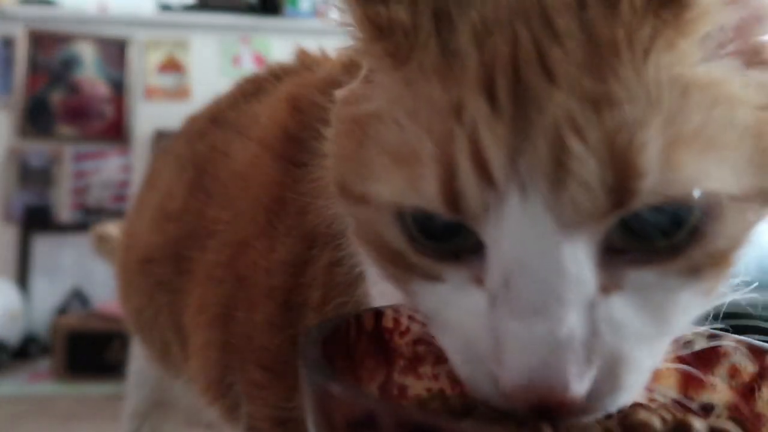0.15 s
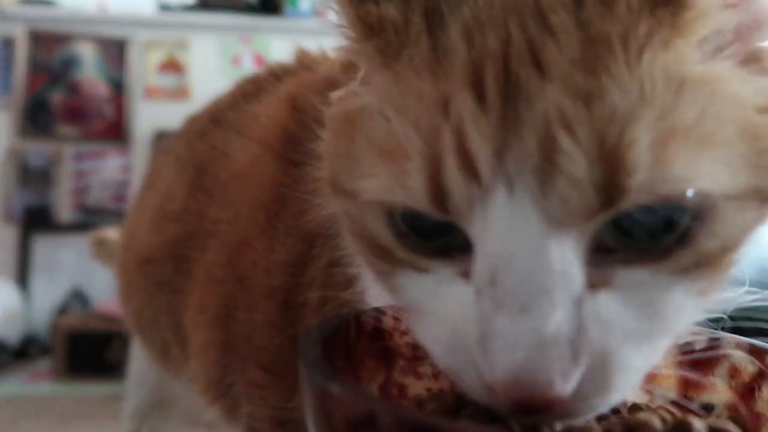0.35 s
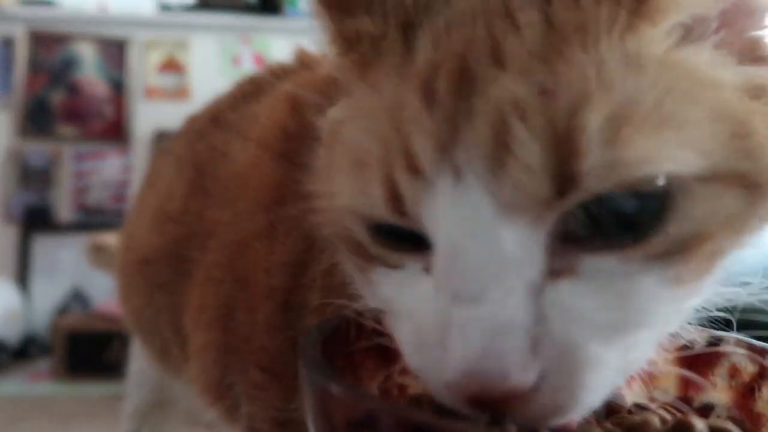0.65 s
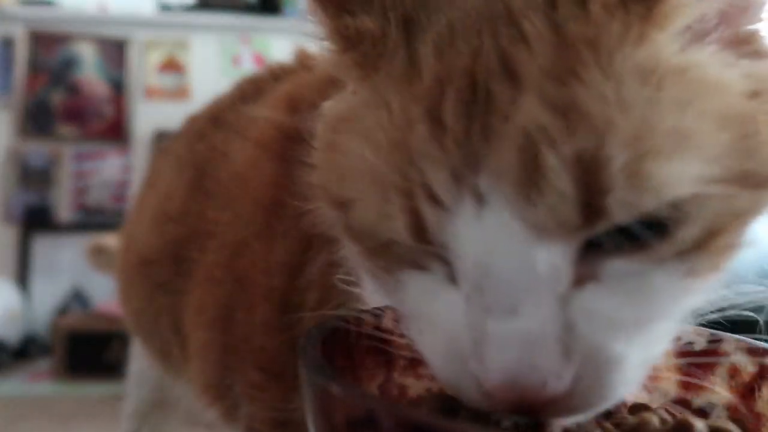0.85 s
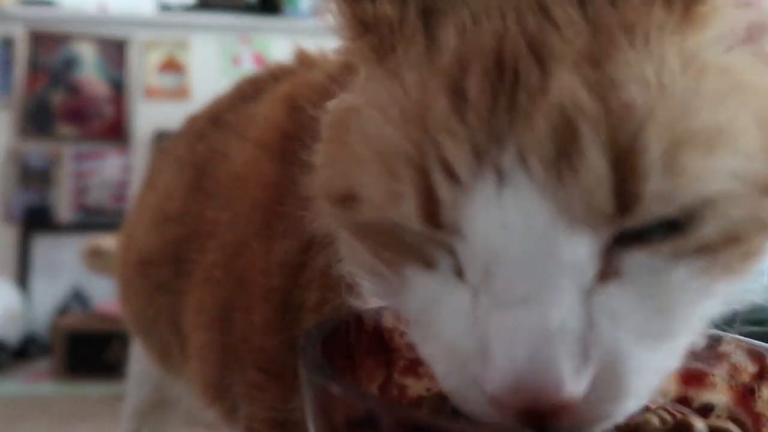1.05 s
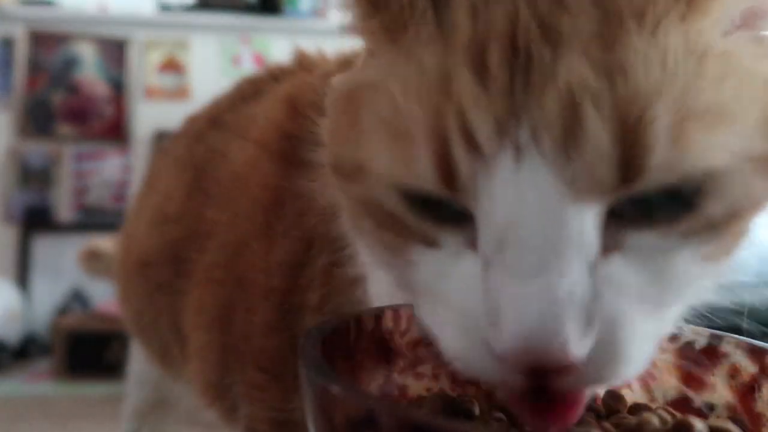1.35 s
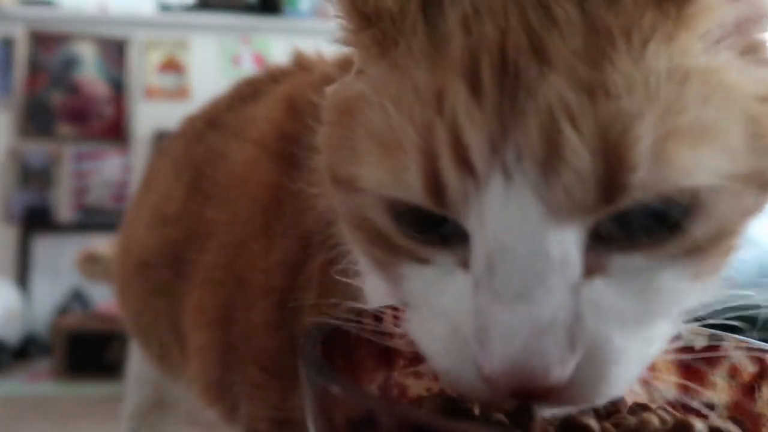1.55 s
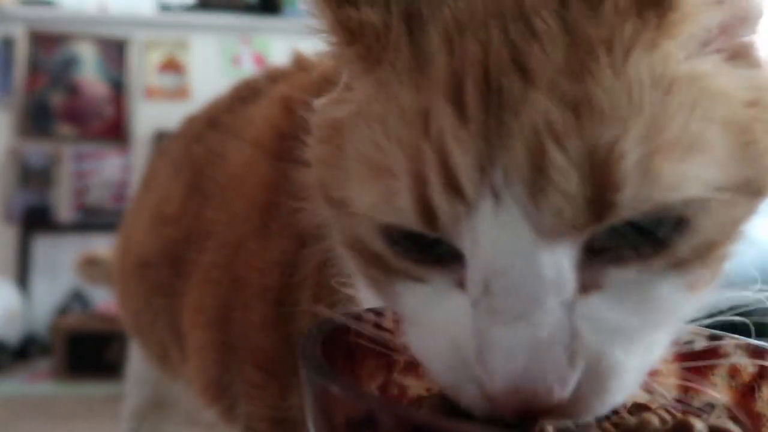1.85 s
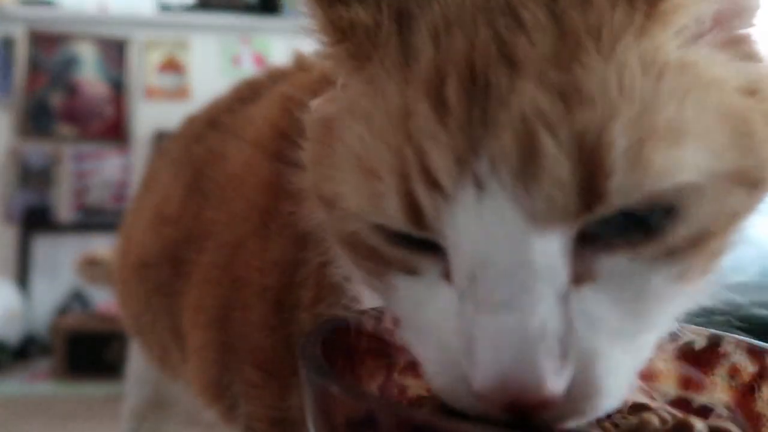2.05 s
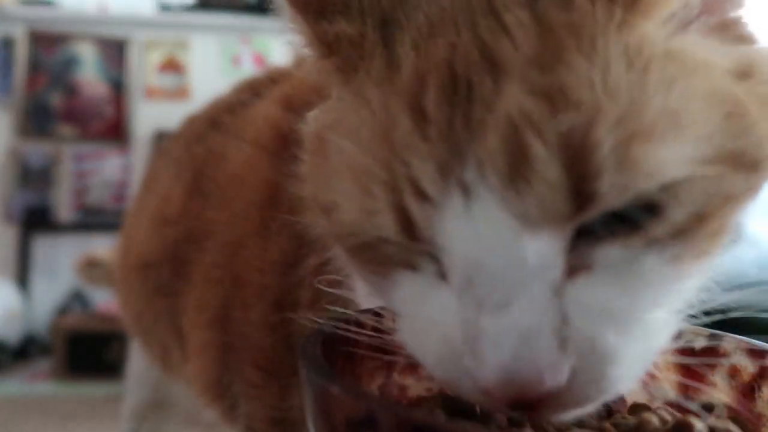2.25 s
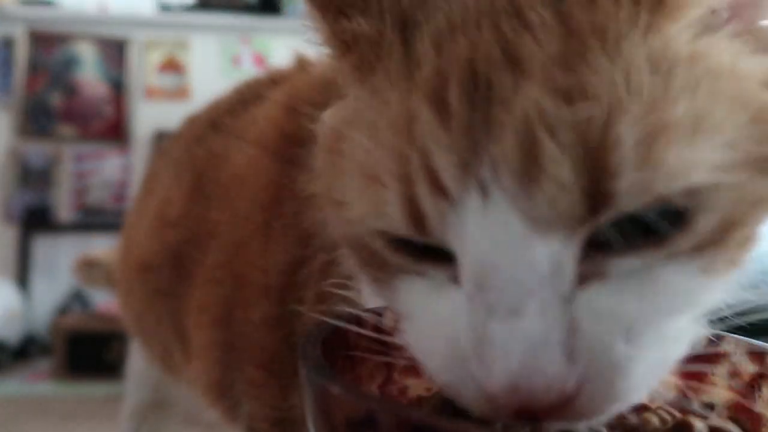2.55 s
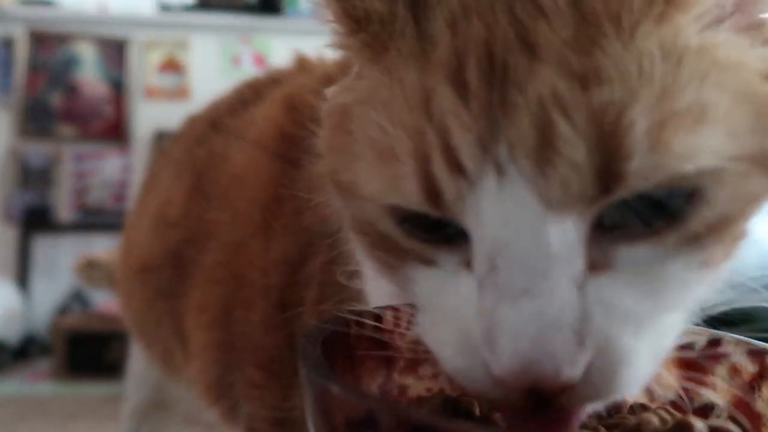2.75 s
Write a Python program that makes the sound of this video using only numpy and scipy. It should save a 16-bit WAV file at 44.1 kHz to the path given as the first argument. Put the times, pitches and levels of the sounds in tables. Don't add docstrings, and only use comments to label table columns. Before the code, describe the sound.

A cat crunches dry kibble very close up, brittle cracks mixed with soft low dish knocks

```python
import sys
import numpy as np
from scipy import signal
from scipy.fft import rfft, irfft, next_fast_len
from scipy.io import wavfile
from scipy.ndimage import map_coordinates

SR = 44100
rng = np.random.default_rng(int(sys.argv[2]) if len(sys.argv) > 2 else 0)


def field_ratio(decibels):
    return 10 ** (np.asarray(decibels, dtype=float) / 20)


def wav_out(sig):
    wavfile.write(sys.argv[1], SR, np.round(np.clip(np.atleast_2d(sig).T, -1, 1) * 32767).astype(np.int16))


N = 127890


def rms_one(x):
    return x / np.sqrt(np.mean(x ** 2) + 1e-20)


def at_hz(points, hz):
    table_hz, values = np.transpose(points)
    return np.interp(np.log(hz), np.log(table_hz), values)


def drift(rate):
    r = np.exp(-80 * np.pi * rate / SR)
    white = rng.standard_normal(N // 40 + 2002)
    slow = signal.lfilter([1], [1, -2 * r, r * r], white)[2000:]
    return np.interp(np.arange(N) / 40, np.arange(len(slow)), rms_one(slow))


def ring(clicks, hz, t60):
    r, w = field_ratio(-60 / (t60 * SR)), 2 * np.pi * hz / SR
    return signal.lfilter([0, np.sin(w)], [1, -2 * r * np.cos(w), r * r], clicks + 1e-18)


def narrow(x, hz):
    return signal.lfilter(*signal.iirpeak(hz, 1.5, fs=SR), x)


def grains(rate, spread_db):
    signs = rng.choice([-1, 1], N)
    sizes = field_ratio(spread_db * np.minimum(rng.exponential(1, N), 5)) * signs
    return rms_one(sizes * (rng.random(N) < rate / SR))


def banded_noise(spectrum, alike_table, patchy_db):
    out, edges = 0, 20 * 2 ** np.arange(0, 9.6, .5)
    white = rng.standard_normal((2, 2, N))
    for k, (low, high) in enumerate(zip(edges, edges[1:])):
        band = signal.butter(2, [low, high], "band", fs=SR, output="sos")
        mid, side = signal.sosfilt(band, white[k % 2])
        hz = np.sqrt(low * high)
        alike = np.clip(at_hz(alike_table, hz), -1, 1)
        stereo = np.sqrt(1 + alike) * mid + np.sqrt(1 - alike) * side * [[1], [-1]]
        out = out + field_ratio(at_hz(spectrum, hz) + patchy_db * drift(3.22)) * stereo
    return rms_one(out)


# f/Hz, level/dB
HUM = [(22, -16), (62, 0), (150, -7), (600, -13.5), (2000, -23.5), (9000, -36), (13000, -42)]
# f/Hz, likeness/1
HUM_ALIKE = [(70, .996), (300, 0.13), (700, 0.61), (3000, 0.085)]


def room_hum():
    return field_ratio(-51) * banded_noise(HUM, HUM_ALIKE, patchy_db=-2.3)


# t/s, level/dB
NUZZLE = [(0, -52), (.75, -43.5), (1.0, -44.5), (1.4, -36), (1.62, -38), (1.72, -46.5), (1.85, -33.5),
          (2.08, -42.5), (2.25, -50.5), (2.55, -28), (2.9, -64.5)]


def muzzle():
    s, db = np.transpose(NUZZLE)
    return field_ratio(np.interp(np.arange(N) / SR, s, db))


# f/Hz, level/dB
RUMBLE = [(50, -57), (120, -12), (200, 5), (360, 4.5), (620, -46), (1200, -58)]


def dragging():
    alike = [(50, 0.87), (900, 0.84)]  # f/Hz, likeness/1; only one channel is used
    return field_ratio(0.5) * muzzle() * banded_noise(RUMBLE, alike, patchy_db=4.0)[0]


def fades(s, db, t60):
    power = np.zeros(N)
    np.add.at(power, (s * SR).astype(int), field_ratio(2 * db))
    fall = field_ratio(-120 / (t60 * SR))
    rise = np.exp(-1 / (.0025 * SR))
    return np.sqrt(signal.lfilter([1 - rise], np.convolve([1, -fall], [1, -rise]), power + 1e-18))


# t/s, peak level/dB, treble re peak/dB, crumbling re peak/dB, favoured
# f/Hz
BITES = [(0.217, -39, -31, -6, 818), (0.255, -21, -16.5, -12, 2180), (0.303, -27, -37, -2.5, 744),
         (0.442, -24, -51, -13, 614), (0.523, -21.5, -37, -7, 1790), (0.565, -38, 11, -8, 900),
         (0.65, -27, -14, -7, 744), (0.798, -11.5, -18.5, -8.5, 2970), (0.805, -15, -7, -32, 855),
         (0.837, -22, -30, -5.5, 1560), (0.885, -20.5, -22, -6.5, 840),
         (0.956, -21.5, -41, -19.5, 694), (1.012, -27, -40, -3.5, 1470),
         (1.031, -26.5, -11, -2.5, 1900), (1.083, -9.5, -4.5, -13, 2000),
         (1.094, -19.5, -25.5, 1.5, 2080), (1.135, -10.5, -53, -7, 1540), (1.168, -17, -24, 0, 1940),
         (1.245, -6, -11.5, -16, 1060), (1.257, -20, -3, -14.5, 2080),
         (1.344, -12, -6.5, -12.5, 1400), (1.37, -9.5, -17, -11, 2110), (1.384, -18, -13, -5, 1950),
         (1.463, -48, -10, 14.5, 2080), (1.485, -8.5, -11.5, -10, 2960), (1.502, -14, -28, -30, 1780),
              (1.575, -15.5, -14.5, -13, 2240), (1.627, -19.5, -14.5, -6, 1300),
              (1.75, -17.5, -5.5, -22, 2500), (1.799, -8.5, -14, -13, 1160), (1.822, -11, -49, -8, 1830),
              (1.927, -8, -8, -16, 2120), (2.033, -30, -26, -1, 1490), (2.053, -22, -23.5, 0.5, 1530),
              (2.145, -24, -36, -34, 960), (2.2572, -18.5, -14.5, -27.5, 2130),
              (2.323, -19.5, -19, -11.5, 1280), (2.383, -21.5, -5.5, -6.5, 1780),
              (2.42, -6.5, -5, -16.5, 1540), (2.474, -13, -46, -4, 1250), (2.551, -7.5, -20, -29, 1390),
              (2.569, -14, -6, -12, 1670), (2.594, -17.5, -19.5, 1, 960),
              (2.616, -14.5, -16.5, -10.5, 2330), (2.675, -16, -26, -9.5, 735),
              (2.704, -17.5, -24, -12.5, 2520), (2.75, -22, -20, -11.5, 1370)]
# t/s, peak level/dB, favoured f/Hz
TICKS = [(0.4455, -35, 1520), (0.4555, -38, 1580), (0.5747, -32, 2420), (0.5817, -40, 2270),
         (0.6102, -35, 2180), (0.6742, -29, 2130), (0.8128, -26.5, 1360), (0.85, -25, 2470),
         (1.054, -13, 1660), (1.093, -16, 1900), (1.0998, -13, 2200), (1.1451, -13, 1580),
         (1.1546, -17, 2140), (1.2533, -16, 2150), (1.2602, -20, 1610), (1.274, -15, 1240),
         (1.3527, -16, 1790), (1.378, -18, 2140), (1.3818, -28, 1600), (1.3887, -21, 2350),
         (1.3985, -18, 2400), (1.495, -21, 2570), (1.51, -18, 1700), (1.5266, -16, 1820),
         (1.5633, -21, 2080), (1.5758, -14, 1930), (1.5835, -17.5, 2340), (1.611, -20, 2350),
         (1.6185, -20, 1960), (1.635, -20, 1470), (1.8083, -38, 1280), (1.8314, -17, 1400),
         (1.934, -13.5, 2240), (1.9549, -25, 2000), (2.069, -21.5, 1500), (2.0749, -35, 1670),
         (2.0877, -25, 1230), (2.1552, -39, 1220), (2.2511, -27, 2180), (2.3334, -45, 1260),
         (2.4223, -10, 1570), (2.4303, -12, 1570), (2.4436, -19.5, 2260), (2.4971, -16, 1260),
         (2.5529, -12.5, 1370), (2.561, -15.5, 1700), (2.5729, -21, 1840), (2.5769, -20, 1720),
         (2.6244, -14.5, 2350), (2.8295, -38.5, 1500)]
# f/Hz, level/dB
CRUNCH = [(480, 1), (750, -8.5), (2000, 0.5), (4000, -7.5), (8500, -17), (12000, -37)]
# f/Hz, level/dB, T60/s
DISH = [(743, -22, .08), (953, -23, .07), (1100, -22, .06), (1344, -25, .05), (2100, -24, .04),
        (2253, -24, .06), (2946, -24, .06)]
TREBLE_FROM_HZ, TREBLE_MEAN_DB = 1990, -16.5
FAVOUR_DB, FAVOUR_OCTAVES, OWN_COLOUR_DB = 5, .3, 3.5
SNAP_LAG_S, SNAP_S, SNAP_DB, SNAP_SPREAD_DB = .0008, 0.00079, -9, 0.5
SNAP_CYCLES, GRAIN_CYCLES = 8, 10
GRAINS_PER_S, GRAIN_SPREAD_DB, SHIFT_DB = 4500, 1, -2
CRUMBLE_T60_S, TREBLE_T60_S, CRUMB_TREBLE_DB = 0.14, 0.18, 0
TICK_DB, TICK_TREBLE_DB, TICK_CRUMBLE_DB = 2.5, -22.5, -13


def pellets():
    ticks = [(s, db + TICK_DB, TICK_TREBLE_DB, TICK_CRUMBLE_DB, hz) for s, db, hz in TICKS]
    s, db, treble, crumble, favoured = np.transpose(BITES + ticks)
    shifting = field_ratio(SHIFT_DB + 2.66 * drift(86)) * muzzle()
    clumps = field_ratio(1.5 * drift(80))
    pitches = np.geomspace(480, 12000, 24)
    crumbs = grains(GRAINS_PER_S * clumps, GRAIN_SPREAD_DB)
    dealt = rng.integers(0, 8, N)
    chance = rng.standard_normal((len(s), 24, 3))
    delay = rng.exponential(1, (len(s), 24, 3))
    out, force = np.zeros(N), np.zeros(N)
    for k, hz in enumerate(pitches):
        high = np.clip(np.log2(hz / TREBLE_FROM_HZ), 0, 1)
        favour = FAVOUR_DB * np.exp(-(np.log2(hz / favoured) / FAVOUR_OCTAVES) ** 2)
        level = db + high * (treble - TREBLE_MEAN_DB) + favour + OWN_COLOUR_DB * chance[:, k - 2, 0]

        snaps = np.zeros(N)
        at = ((s[:, None] + SNAP_LAG_S + SNAP_S * delay[:, k]) * SR).astype(int)
        uneven = field_ratio(SNAP_SPREAD_DB * chance[:, k]) * np.sign(chance[:, k - 1])
        np.add.at(snaps, at, field_ratio(level + SNAP_DB)[:, None] * uneven)

        t60 = CRUMBLE_T60_S + high * (TREBLE_T60_S - CRUMBLE_T60_S)
        crumbling = fades(s, level + crumble + high * CRUMB_TREBLE_DB, t60)
        flow = clumps * crumbling + shifting
        own = np.roll(crumbs, 997 * (k // 8)) * (dealt == k % 8) * flow

        colour = field_ratio(at_hz(CRUNCH, hz) + 10 * np.log10(hz / 2000))
        snapping = .5 * ring(snaps, hz, SNAP_CYCLES / hz)
        crumbing = np.sqrt(hz / 2000) * 0.14 * ring(own, hz, GRAIN_CYCLES / hz)
        out += colour * narrow(snapping + crumbing, hz)
        if k % 6 == 1:
            force += snaps + .5 * own
    return out + field_ratio(-12) * sum(field_ratio(d) * ring(force, hz, t) for hz, d, t in DISH)


# t/s, peak level/dB, f/Hz
THUDS = [(0.099, -24, 130), (0.256, -21.5, 373), (0.3, -18, 184), (0.442, -22, 136.4), (0.569, -23.5, 252),
         (0.659, -17, 475), (0.797, -19, 169), (0.916, -18, 177), (0.986, -26.5, 132), (1.027, -19, 372),
         (1.057, -12, 133), (1.089, -14, 197), (1.133, -28.5, 258), (1.166, -13, 309), (1.244, -19.5, 340),
         (1.342, -15.5, 328), (1.381, -12, 274), (1.485, -6.5, 344), (1.572, -25.5, 237), (1.657, -18, 218),
         (1.742, -22, 187), (1.799, -12.5, 158), (1.915, -18.5, 149), (2.035, -18.5, 238),
         (2.144, -18.5, 182), (2.327, -17.5, 114), (2.42, -7.5, 340), (2.505, -22, 198), (2.569, -9.5, 288),
         (2.686, -17.5, 320)]
# t/s, peak level/dB, f/Hz
FURTHER_KNOCKS = [(0.0608, -28, 166), (0.3191, -12.5, 154), (0.43, -23, 260), (0.4509, -17, 131), (0.4584, -19, 132),
                  (0.949, -23, 160), (1.0375, -14, 384), (1.1461, -12.5, 350), (1.1562, -18.5, 307),
                  (1.2727, -16.5, 303), (1.3624, -21.5, 293), (1.5076, -13, 315), (1.8296, -13.5, 270),
                  (1.9281, -12.5, 177), (2.0565, -19, 239), (2.0879, -21, 220), (2.4581, -14, 186),
                  (2.516, -13.5, 188), (2.5475, -15, 387), (2.5874, -17, 161), (2.6152, -19, 162),
                  (2.7567, -26, 170)]
THUD_DB, FURTHER_DB, OVERTONE_DB = -1, -1, -5
PUSH_S, THUD_CYCLES = .0008, 3.2
RATTLES_PER_S, RATTLE_T60_S, RATTLE_DB = 500, .12, -9


def thuds():
    out, t = np.zeros(N + SR), np.arange(SR // 3) / SR
    rattle = grains(RATTLES_PER_S, spread_db=3.0)
    soft = np.exp(-1 / (PUSH_S * SR))
    knocks = THUDS + [(s, db + FURTHER_DB, hz) for s, db, hz in FURTHER_KNOCKS]
    for k, (s, db, hz) in enumerate(knocks):
        i = int(s * SR)
        dying = field_ratio(-60 * t / RATTLE_T60_S) * np.sqrt(RATTLES_PER_S / SR)
        push = field_ratio(RATTLE_DB) * np.roll(rattle, -2001 * k)[:len(t)] * dying + (t == 0)
        make_up = np.hypot(1, 2 * np.pi * hz * PUSH_S)
        push = signal.lfilter([(1 - soft) * make_up], [1, -soft], push)
        above = ring(push, 1.7 * hz, THUD_CYCLES / hz / 1.7)
        above = above + ring(push, 2.8 * hz, THUD_CYCLES / hz / 2)
        body = ring(push, hz, THUD_CYCLES / hz)
        out[i:i + len(t)] += field_ratio(db + THUD_DB) * (body + field_ratio(OVERTONE_DB) * above)
    return signal.sosfilt(signal.butter(3, [105, 1100], "band", fs=SR, output="sos"), out[:N])


# t/s, length/s, level/dB, f/Hz
RUBS = [
    (0.559, 0.044, -32, 937),
    (0.56, 0.039, -37.5, 2270),
    (0.572, .016, -37, 9600),
    (2.143, 0.013, -29.5, 1240),
    (2.152, 0.031, -34.5, 605),
    (2.164, 0.018, -34, 920),
]


def rubs():
    t, grit = np.arange(N) / SR, grains(2500, spread_db=1.5)
    out = 0
    for s, length, db, hz in RUBS:
        stroke = field_ratio(db) * grit * (t > s) * (t < s + length)
        t60 = min(.6 * length, 32 / hz)
        out = out + narrow(ring(stroke, hz, t60), hz) / np.sqrt(t60 * SR / 12)
    return out


def room(x, shortest, t60):
    size = next_fast_len(N + SR)
    hz = np.arange(size // 2 + 1) * SR / size
    wall = 1 / (1 + 1j * hz / 35000)
    spectrum = rfft(x, size)
    out = []
    for lags in shortest * rng.uniform(1, 3.5, (2, 6)):
        loops = [field_ratio(-60 * d / t60) * wall * np.exp(-2j * np.pi * hz * d) for d in lags]
        out.append(irfft(spectrum * sum(g / (1 - g) for g in loops), size)[:N])
    return np.array(out)


# f/Hz, level/dB
LEFT_LOUDER = [(200, 0.5), (1400, 1), (5000, 2), (13000, 0)]
LEFT_EARLY_SAMPLES, HEAD_SWAY_SAMPLES = 1.7, .7


def ports(x):
    hz = np.arange(N // 2 + 1) * SR / N + 1
    lead = np.exp(1j * np.pi * hz * LEFT_EARLY_SAMPLES / SR)
    tilt = field_ratio(at_hz(LEFT_LOUDER, hz) / 2) * lead
    sway = HEAD_SWAY_SAMPLES / 2 * drift(25)
    left, right = irfft(rfft(x) * tilt, N), irfft(rfft(x) / tilt, N)
    left = map_coordinates(left, [np.arange(N) + sway], order=5)
    right = map_coordinates(right, [np.arange(N) - sway], order=5)
    return np.array([left, right])


def scene():
    hum, drag = room_hum(), dragging()
    crunch = pellets() + rubs()
    around = field_ratio(-23) * room(crunch, shortest=.011, t60=0.34) + hum
    return ports(crunch + thuds() + drag) + around


def roll_off(x):
    return signal.sosfilt(signal.butter(12, 15810, fs=SR, output="sos"), x)


def record(dry):
    dulled = signal.sosfilt(signal.butter(6, 12600, fs=SR, output="sos"), dry)
    return roll_off(dulled)


dry = scene()
out = record(dry)
wav_out(out)
```